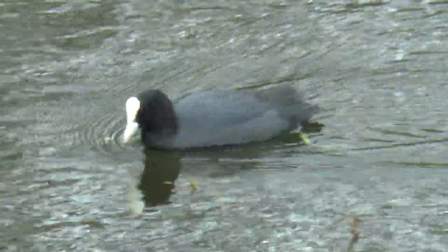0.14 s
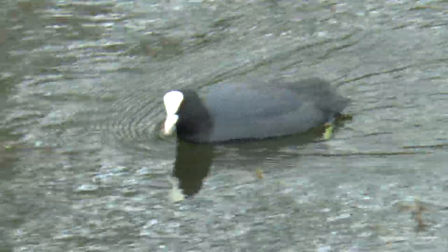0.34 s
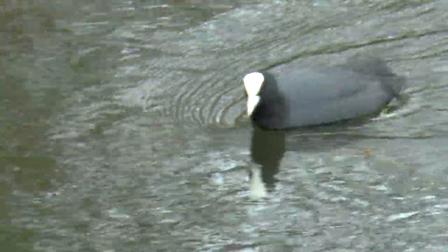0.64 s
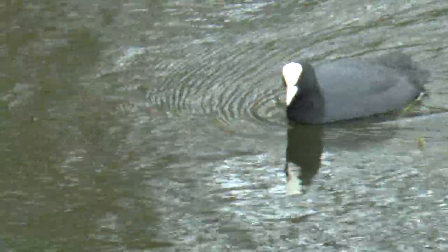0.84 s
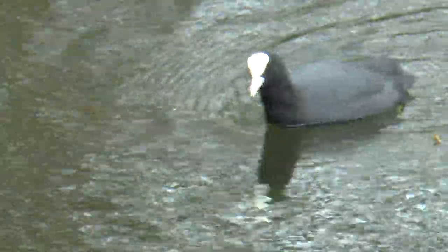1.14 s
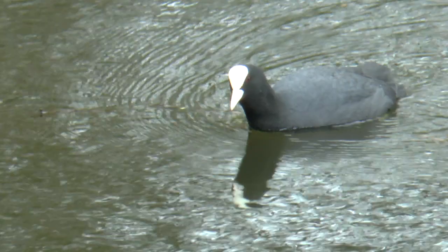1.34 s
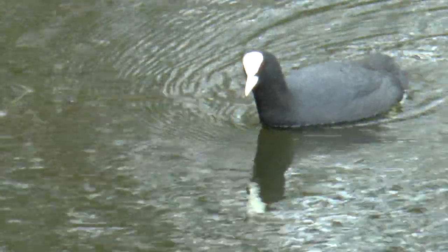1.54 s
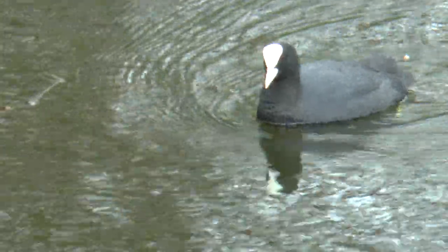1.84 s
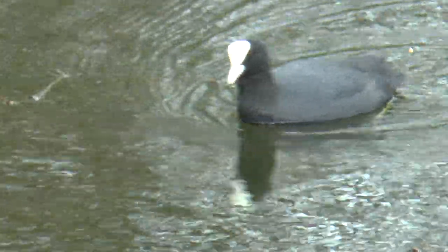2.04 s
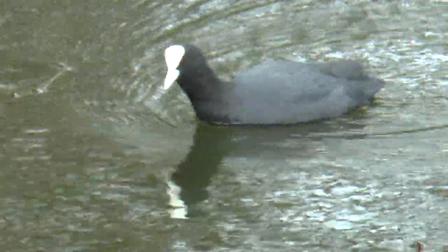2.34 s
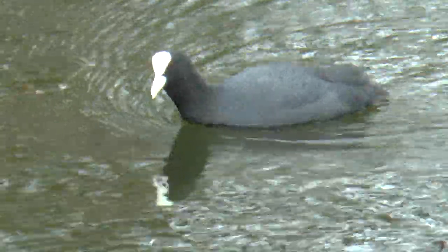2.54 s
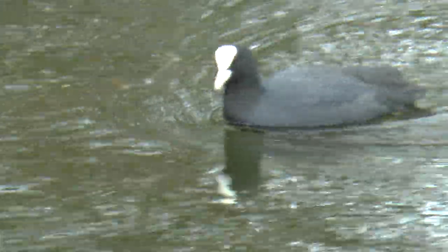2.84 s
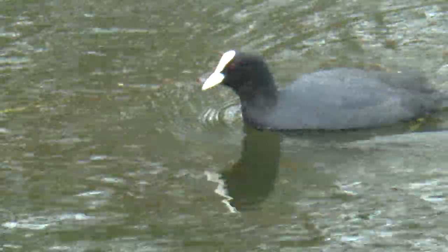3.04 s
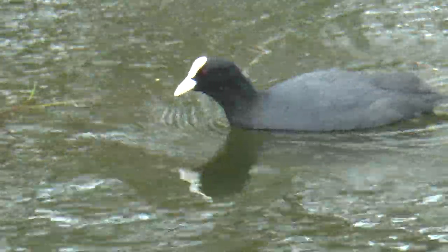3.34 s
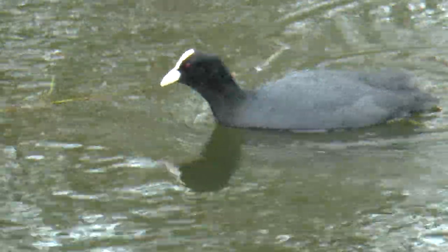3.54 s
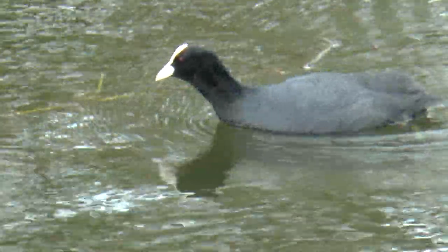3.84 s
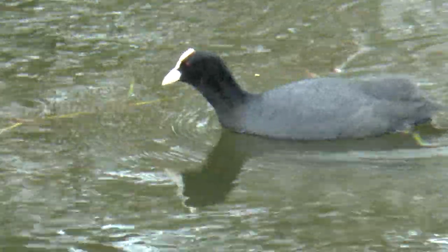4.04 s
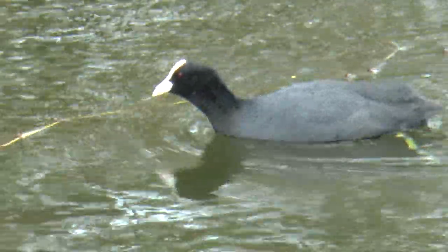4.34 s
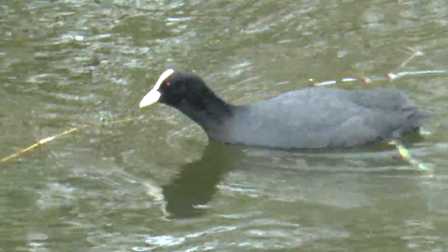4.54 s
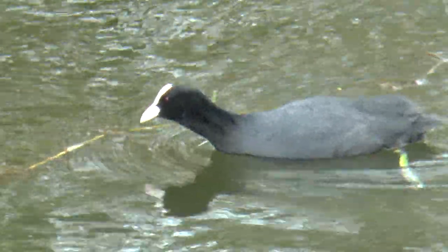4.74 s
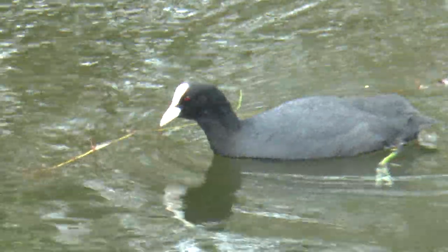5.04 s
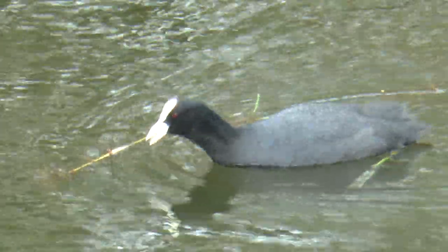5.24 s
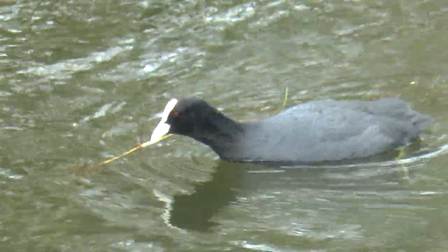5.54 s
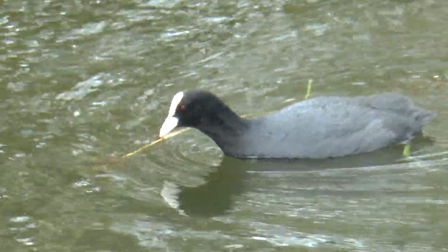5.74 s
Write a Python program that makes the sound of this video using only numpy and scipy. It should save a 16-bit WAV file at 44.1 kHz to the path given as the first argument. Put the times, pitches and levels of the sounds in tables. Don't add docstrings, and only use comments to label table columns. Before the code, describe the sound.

Outdoors on a lake, low wind rumbles and thumps directly on the microphone, strongest in the first second and a half. Through it a coot pipes seven clear, very short whistled notes that slur downward, irregularly spaced, each with a faint echo from the banks. A far bird chirps hoarsely twice, tiny droplets tick nearby, and a quiet wash of water and leaves lies behind.

```python
import sys
import numpy as np
from scipy import signal
from scipy.fft import rfft, irfft
from scipy.io import wavfile
from scipy.ndimage import uniform_filter1d

SR = 44100
rng = np.random.default_rng(int(sys.argv[2]) if len(sys.argv) > 2 else 0)


def voltage_ratio(level):
    return 10 ** (np.asarray(level, float) / 20)


def to_wav(sig):
    pcm = np.clip(np.atleast_2d(sig), -1, 1) * 32767
    pcm = np.round(pcm).astype(np.int16)
    wavfile.write(sys.argv[1], SR, pcm.T)


N = 259749


def evened(x):
    return x / np.sqrt(np.mean(x ** 2) + 1e-20)


def read(points, hz):
    f, value = np.transpose(points)
    return np.interp(np.log(hz + 1), np.log(f + 1), value)


def add(mix, s, sound):
    at = round(s * SR)
    part = mix[max(at, 0):][:len(sound) + min(at, 0)]
    part += sound[max(-at, 0):][:len(part)]


def coot():
    # [start/s, hold/s, release/s, fundamental level/dB, top pitch f/Hz]
    notes_sung = [
        (-.06, 0.051, 0.03, -27, 1317),
        (.537, 0.05, 0.03, -20, 1432),
        (1.385, 0.046, 0.039, -16, 1334),
        (2.62, 0.05, 0.044, -19, 1365),
        (3.093, 0.034, .02, -23, 1278),
        (3.564, 0.035, 0.051, -17.5, 1357),
        (4.293, 0.051, 0.044, -16.5, 1377),
        (5.323, 0.044, 0.069, -16, 1376),
    ]
    # [flat by f/Hz, break after t/s, break takes t/s, sag/(Hz/s)]
    slurs = [(40, 0.0169, 0.0034, 2060), (75, .017, 0.0013, 2260), (73.6, 0.015, 0.0042, 2140),
             (64.3, 0.017, 0.0028, 2970), (5, 0.0174, 0.0039, 2800), (35, 0.0188, 0.0021, 2370),
             (45, .011, .005, 2600), (50, 0.0065, .005, 2200)]
    # [2nd, 3rd, 4th partial level/dB]
    poses = [(-16, -32, -45), (-14.5, -24, -39.5), (-14.5, -21.5, -39), (-14.5, -21, -37.5),
             (-13, -32, -55), (-15.5, -27.5, -50), (-16, -23, -41.5), (-15, -21.5, -43)]
    # [upper partials level/dB, resonance f/Hz, width f/Hz, leak of other partials level/dB]
    beaks = [(-66, 7000, 900, -15), (-64.5, 7000, 900, -9), (-51, 8900, 2100, -14.5), (-51, 11000, 1500, 2),
             (-73, 7000, 2000, -10), (-51.5, 8300, 1000, -10), (-46, 9700, 2000, -15),
             (-46, 11700, 1600, -21)]
    # [scattered echo level/dB, slap delay t/s, slap level/dB]
    returns = [(-23.5, 0.038, -30), (-23.5, 0.07, -18.5), (-25.5, 0.075, -20), (-20.5, 0.033, -17),
               (-21, .07, -25), (-18.5, 0.036, -24), (-19.5, .045, -36), (-22, 0.073, -18.5)]
    out = np.zeros(N)
    for row in zip(notes_sung, slurs, poses, beaks, returns):
        add(out, row[0][0], note(*row))
    return out


def note(row, bend, pose, mouth, shore):
    hold_s, release_s, db, top_hz = row[1:]
    second_db, third_db, fourth_db = pose
    t = np.arange(0, hold_s + release_s, 1 / SR)
    first = voltage_ratio(db + breath(t, hold_s, release_s))
    effort = first / first.max()
    hz = slur(t, top_hz, *bend)
    wobble = evened(uniform_filter1d(uniform_filter1d(rng.standard_normal(SR // 5), 200), 200))[:len(t)]
    phase = 2 * np.pi * np.cumsum(hz * (1 + 0.0035 * wobble)) / SR

    second = voltage_ratio(second_db) * effort ** 0.49 * np.cos(2 * phase + 1.9)
    third = voltage_ratio(third_db) * effort ** 1.1 * np.cos(3 * phase)
    low = np.cos(phase) + second + third

    fourth = voltage_ratio(fourth_db) * first * effort
    share = np.vstack([fourth, upper_partials(t, hz, effort, *mouth)])
    noise = rng.standard_normal((len(share), SR // 5))
    flicker = voltage_ratio(3.9 * evened(uniform_filter1d(noise, 170, axis=1)))[:, :len(t)]
    order = np.arange(4, 13)[:, None]
    shine = (share * flicker * np.cos(order * phase)).sum(0)

    dry = np.sqrt(2) * (first * low + shine) * signal.windows.tukey(len(t), .04)
    wet = shore_return(dry, *shore)
    add(wet, 0, dry)
    return wet


def breath(t, hold_s, release_s):
    attack_s, attack_db, swell_db, release_db = 0.0094, -24.5, -0.4, -18
    rise = attack_db * np.clip(1 - t / attack_s, 0, 1) ** 1.34
    swell = swell_db * np.clip(t / hold_s * 2 - 1, -1, 0)
    return rise + swell + release_db * np.clip((t - hold_s) / release_s, 0, 1) ** 1.9


def slur(t, top_hz, flat_hz, break_s, takes_s, sag_hz_per_s):
    level_off_s = 0.091
    fall = sag_hz_per_s * level_off_s * (1 - np.exp(-(t - break_s - takes_s) / level_off_s))
    return top_hz - fall - flat_hz * .5 * (1 - np.tanh((t - break_s) / takes_s))


def upper_partials(t, hz, effort, upper_db, beak_hz, width_hz, leak_db):
    peak_s, rise_db, fade_db_per_s = .016, -13, 295
    closing_s, leak_db_per_partial = 0.054, -1.5
    order = np.arange(5, 13)[:, None]
    upper = voltage_ratio(upper_db + np.minimum(rise_db * (1 - t / peak_s), fade_db_per_s * (peak_s - t)))
    closing = 1 - 0.26 * np.minimum(t / closing_s, 1) ** 1.7
    beak = voltage_ratio(-6 * ((order * hz - beak_hz * closing) / width_hz) ** 2)
    beak += voltage_ratio(leak_db + leak_db_per_partial * (order - 8))
    beak *= 1 - 0.42 * np.exp(-((order * hz - 6700) / 700) ** 2)
    return voltage_ratio(-0.5) * upper * effort * beak / np.sqrt((beak ** 2).sum(0))


def shore_return(dry, echo_db, delay_s, slap_db):
    shimmer, shimmer_s = 0.38, 0.0081
    taps = voltage_ratio(echo_db) * echoes()
    taps[round(delay_s * SR):][:3] += voltage_ratio(slap_db) / 3
    wet = signal.fftconvolve(dry, taps)
    window = np.hanning(round(2 * shimmer_s * SR))
    ripple = evened(signal.fftconvolve(rng.standard_normal(SR), window, "same"))[:len(wet)]
    return wet * (np.sqrt(1 - shimmer ** 2) + shimmer * ripple)


def echoes():
    # [f/Hz, t60/s]
    banks = [(500, 0.81), (1300, 0.7), (3000, 0.55), (6000, 0.33), (12000, 0.15)]
    # [f/Hz, level/dB]
    bank_colour = [(1300, -5.5), (2600, -3), (4000, 5.5), (5500, 8.5), (8500, 7), (12000, -1)]
    taps = np.zeros(SR // 2)
    at = np.arange(200, len(taps) - 40, 40)
    taps[at + rng.integers(0, 40, len(at))] = rng.standard_normal(len(at))
    hz, t, z = signal.stft(taps, SR, nperseg=256)
    clumps = voltage_ratio(1.2 * evened(uniform_filter1d(rng.standard_normal(len(t)), size=5)))
    swell = (1 - np.exp(-(t / 0.018) ** 2)) * clumps
    decay_db = read(bank_colour, hz)[:, None] - 60 * t / read(banks, hz)[:, None]
    tail = signal.istft(z * swell * voltage_ratio(decay_db), SR, nperseg=256)[1]
    return voltage_ratio(7.5) * tail / np.linalg.norm(tail)


def wind():
    # [f/Hz, level/(dB/Hz)]
    thump = [(7.1, -32), (12, -5), (33, 2.5), (50, -7.5), (65, -32.5), (110, -120)]
    flutter = [(29, -31), (50, -0.5), (110, -14.5), (140, -70), (240, -120)]
    roar = [(65, -29), (110, -5.5), (167, -11), (220, -14.5), (290, -31.5), (480, -120)]
    # [level/dB, share of wind curve/1, steadiness/1]
    layers = [(0.5, 1, 0.43), (-6, 0.93, 0.63), (-23, 0.65, 0.21)]
    # [t/s, level/dB]
    strength = [(0.0, -11), (0.15, -13.5), (0.55, -15), (0.72, -28), (0.9, -12.5), (1.3, -16), (1.6, -22.5),
                (2.0, -17), (2.35, -14), (2.7, -19), (3.0, -22.5), (3.35, -19.5), (3.7, -21), (4.2, -21.5),
                (4.65, -17), (5.05, -27.5), (5.45, -23.5), (5.89, -16.5)]
    # [t/s, gain/dB, half length/s, quickness/1 (0 thump, 1 flutter, 2 roar)]
    eddies = [(0.1, 6.5, 0.12, 1.72), (0.52, -10.5, 0.023, 0.18), (0.839, 9, 0.014, 1.1),
              (0.88, -9, 0.013, 0.54), (1.122, -17, 0.042, 1.2), (1.34, -11, 0.017, 1.5),
              (1.54, -3, 0.035, 0.41), (1.72, 5, 0.069, 2.1), (1.72, 6, 0.031, 0.12),
              (1.96, -8, 0.025, 0.5), (2.12, -6, 0.033, 2.4), (2.16, -13, 0.091, 0.39),
              (2.22, -7, 0.025, 1.1), (2.32, -26, 0.047, 0.24), (2.4, -17, 0.033, 0.16),
              (2.58, -7.7, 0.071, 0.086), (2.72, -4, 0.021, 0.0), (3.02, -12, 0.04, 0.58),
              (3.16, 8, 0.063, 1.5), (3.32, 13, 0.021, 0.86), (3.58, 10, 0.18, 0.57),
              (3.66, -9.5, 0.11, 1.2), (4.38, -8, 0.036, 0.0), (4.64, 6, 0.032, 0.65),
              (4.78, -14, 0.069, 1.13), (4.962, 9.5, 0.021, 0.0), (5.26, 5.5, 0.16, 0.086),
              (5.4, -17, 0.037, 0.64), (5.52, 10.5, 0.025, 0.52), (5.76, 8.1, 0.071, 0.31)]
    spread = 0.77
    t, out = np.arange(0, N + 64, 64) / SR, 0
    s, gain_db, length_s, quickness = np.transpose(eddies)[:, :, None]
    bumps_db = gain_db * np.exp(-((t - s) / length_s) ** 2)
    for k, (points, (db, share, steady)) in enumerate(zip((thump, flutter, roar), layers)):
        eddy_db = (bumps_db * np.exp(-((k - quickness) / spread) ** 2)).sum(0)
        level_db = db + share * np.interp(t, *np.transpose(strength)) + eddy_db
        z = coloured(points)
        steadied = evened(z.real / (abs(z) + 0.5) ** steady)
        out = out + voltage_ratio(np.interp(np.arange(N) / SR, t, level_db)) * steadied
    return out


def coloured(points):
    hz = np.fft.rfftfreq(N, 1 / SR)
    a, b = rng.standard_normal((2, len(hz)))
    z = np.fft.ifft((a + 1j * b) * voltage_ratio(read(points, hz)), N)
    return z / np.sqrt(np.mean(abs(z) ** 2) / 2)


def slams():
    # [t/s, peak level/dB, swing f/Hz]
    hits = [(0.844, -5, 40), (0.929, -3, 30.6), (1.025, -9, 35), (1.297, -7, 27.8), (1.721, -8, 45),
            (2.051, -8.5, 45), (2.268, -10.5, 45), (2.665, -9.5, 28.3), (3.327, -7.5, 50),
            (3.535, -10.5, 35), (4.665, -7.5, 38.6), (4.945, -11, 20.7), (5.774, -10.5, 55),
            (5.877, -12, 29.7)]
    half_length_cycles, displaced = 0.34, 0.45
    pulses, cover, t = np.zeros(N), np.zeros(N), np.arange(-SR // 10, SR // 10) / SR
    for s, db, hz in hits:
        bell = np.exp(-(t * hz / half_length_cycles) ** 2)
        add(pulses, s + t[0], -voltage_ratio(db + 3) * bell * np.sin(2 * np.pi * hz * t))
        add(cover, s + t[0], bell)
    return pulses, 1 - displaced * np.minimum(cover, 1)


def ducking():
    # [t/s, cut/dB (negative: a brief lift)]
    clamps = [(0.019, 2.5), (0.049, 0.5), (0.102, 1.5), (0.159, 2.5), (.335, -3), (.44, 3), (0.847, 4.5),
              (0.919, 7), (1.015, 8.5), (1.12, 3.5), (1.3, 6.5), (1.42, 0.5), (2.056, 3), (2.669, 7),
              (3.34, 2.5), (3.54, 4.5), (4.661, 1), (5.76, 1.5)]
    recovery_s = 0.15
    at = np.arange(0, N + 32, 32)
    peak_s, depth_db = np.transpose(clamps)[:, :, None]
    since = at / SR - peak_s
    cut_db = depth_db * (since > 0) * np.exp(-abs(since) / recovery_s)
    return voltage_ratio(-np.interp(np.arange(N), at, cut_db.sum(0)))


def far_bird():
    # [t/s, length/s, start f/Hz, end f/Hz, level/dB]
    chirps = [
        (2.161, 0.0206, 2620, 2390, -41),
        (2.184, .011, 2360, 2650, -42),
        (2.191, 0.0099, 2700, 2400, -53),
        (2.203, 0.013, 2740, 2350, -48),
        (5.198, 0.027, 2860, 2180, -45.5),
        (5.226, 0.0089, 2210, 2540, -43),
        (5.231, 0.021, 2360, 2100, -49),
        (5.243, 0.022, 2560, 2700, -49),
    ]
    out = np.zeros(N)
    for s, length_s, from_hz, to_hz, db in chirps:
        hz = np.linspace(from_hz, to_hz, round(length_s * SR))
        hoarse = 1 + 0.53 * evened(uniform_filter1d(rng.standard_normal(len(hz)), 60))
        tone = np.sin(2 * np.pi * np.cumsum(hz) / SR)
        add(out, s, voltage_ratio(db) * 2 * hoarse * tone * np.hanning(len(hz)))
    return out + voltage_ratio(-15) * signal.fftconvolve(out, echoes())[:N]


def ticks():
    # [t/s, level/dB, centre f/Hz, width f/Hz, length/s]
    puffs = [(2.055, -50, 7000, 10000, 0.0022), (2.144, -58, 9000, 4000, 0.016),
             (2.315, -50, 11000, 9000, 0.0052), (2.322, -64.5, 13500, 4000, 0.017),
             (2.658, -55.5, 8900, 9000, .002), (2.666, -46, 6500, 6000, .003),
             (2.437, -49, 6000, 5000, 0.0043), (2.856, -65, 13000, 4000, .01),
             (2.886, -57, 11000, 8000, .02), (1.567, -58.5, 12900, 5000, 0.068),
             (3.455, -50.5, 7000, 6000, .004), (3.415, -49, 5960, 4000, 0.0042),
             (4.5, -61, 13500, 4000, 0.012), (4.535, -62.5, 12500, 2500, .015),
             (5.103, -44, 5900, 1200, 0.0035), (5.113, -49, 9900, 8000, .003),
             (5.761, -46, 5000, 9000, 0.0016)]
    out, t, hz = np.zeros(N), np.arange(4096) / SR, np.fft.rfftfreq(4096, 1 / SR)
    for s, db, centre_hz, width_hz, length_s in puffs:
        colour = voltage_ratio(-12 * ((hz - centre_hz) / width_hz) ** 2)
        band = evened(irfft(rfft(rng.standard_normal(4096)) * colour))
        onset = np.minimum(t / (0.13 * length_s), 1)
        add(out, s, voltage_ratio(db) * band * np.exp(-(t / length_s) ** 2) * onset)
    return out


def lake():
    # [f/Hz, level/(dB/Hz)]
    wash_colour = [(120, -16.5), (220, 4), (320, -7.5), (450, -5), (650, -10.5), (1050, -11), (1900, -22.5),
                   (2800, -26), (3600, -23.5), (4300, -31), (5200, -34), (7000, -37.5), (12000, -43.5),
                   (16000, -48)]
    # [t/s, level/dB]
    drift = [(0, -2), (.4, -7.5), (.8, 0), (1.2, -.5), (2.4, 1), (3.6, -0.85), (4.1, -2), (5.89, -2)]
    tilt_db, tilt_db_per_s = 0.09, -0.0958
    frames, hz = N // 128 + 5, np.fft.rfftfreq(512, 1 / SR)[:, None]
    a, b, patches = rng.standard_normal((frames, 257, 3)).T
    patches = evened(uniform_filter1d(uniform_filter1d(patches, 8, 0), 25, 1))
    flicker = evened(uniform_filter1d(rng.standard_normal(frames), 6))
    t = np.arange(frames) * 128 / SR
    dulling_db = (tilt_db + tilt_db_per_s * t) * np.log2((hz + 100) / 2000)
    drift_db = np.interp(t, *np.transpose(drift)) + dulling_db
    z = (a + 1j * b) * voltage_ratio(read(wash_colour, hz) + drift_db + 0.73 * patches + 0.51 * flicker)
    return voltage_ratio(-35) * evened(signal.istft(z, nperseg=512, noverlap=384)[1][:N])


def scene():
    pulses, left = slams()
    buffeting = wind() * left + pulses
    ducked = ducking() * (coot() + far_bird() + lake())
    return (buffeting + ducked + ticks())[None]


def roll_off(x):
    return signal.sosfilt(signal.butter(12, 15760, fs=SR, output="sos"), x)


def record(dry):
    rounded = .8 * np.tanh(dry / .8)
    limited = signal.oaconvolve(rounded, signal.firwin(255, 15900, fs=SR)[None], "same")
    return roll_off(limited)


dry = scene()
out = record(dry)
to_wav(out)
```